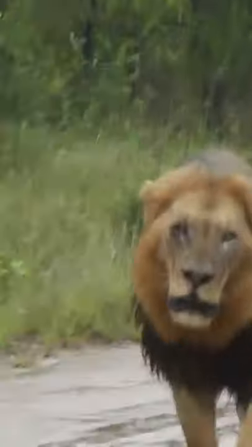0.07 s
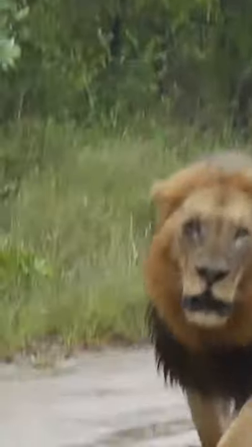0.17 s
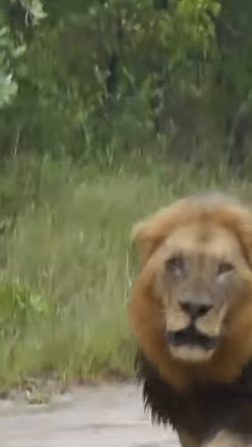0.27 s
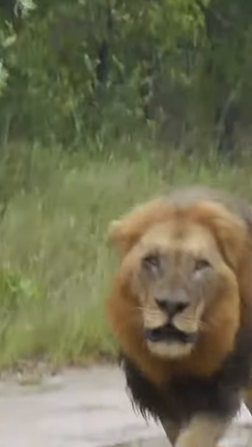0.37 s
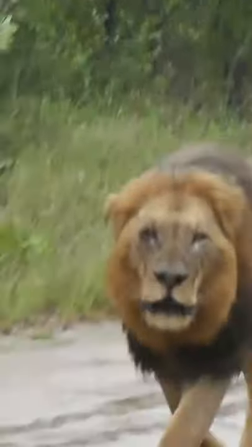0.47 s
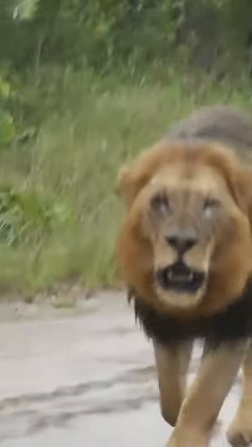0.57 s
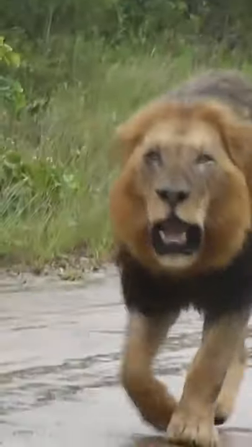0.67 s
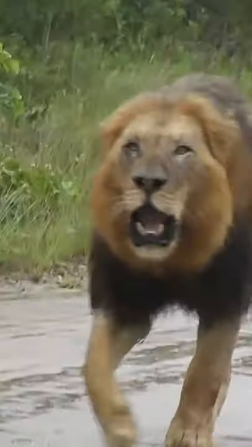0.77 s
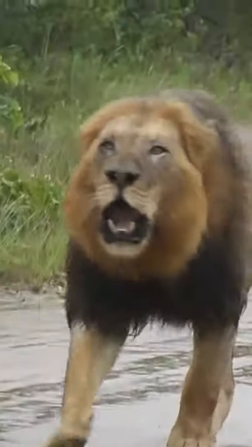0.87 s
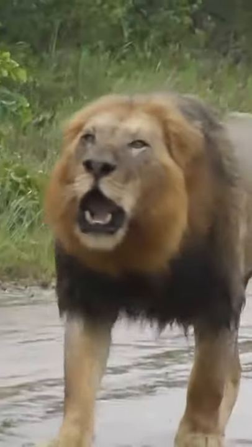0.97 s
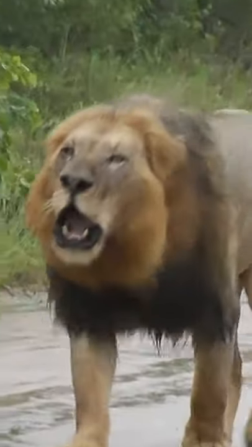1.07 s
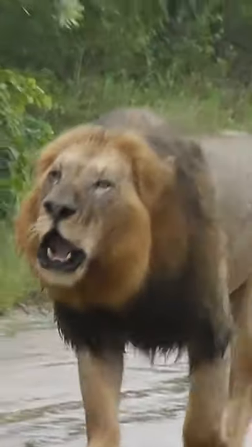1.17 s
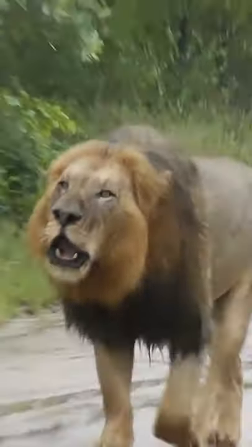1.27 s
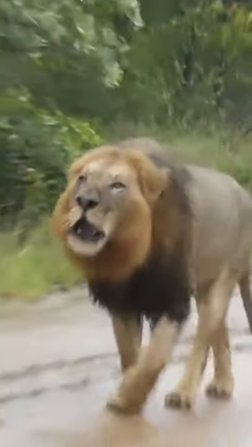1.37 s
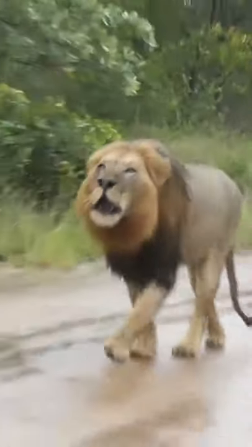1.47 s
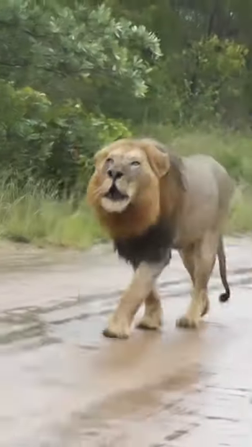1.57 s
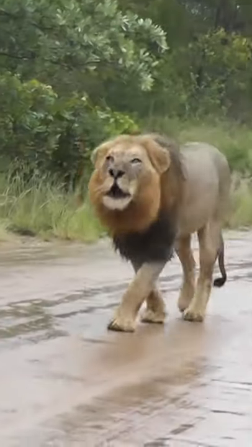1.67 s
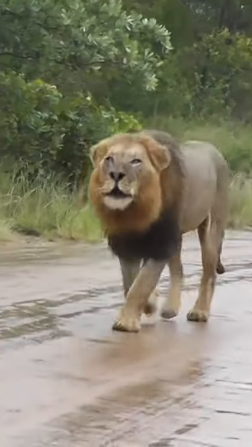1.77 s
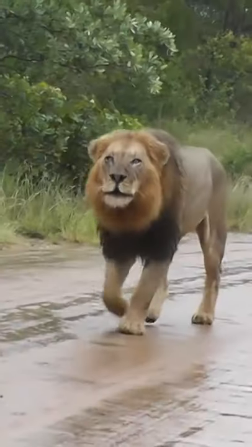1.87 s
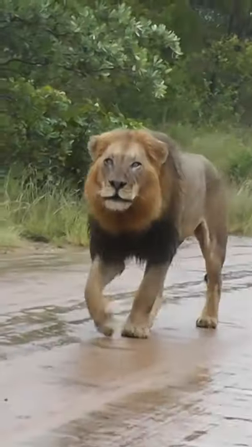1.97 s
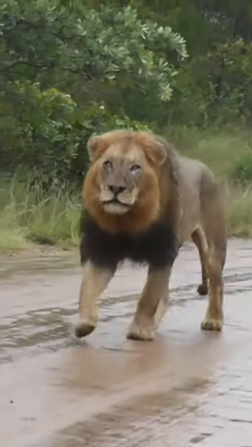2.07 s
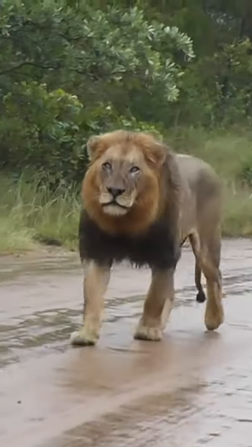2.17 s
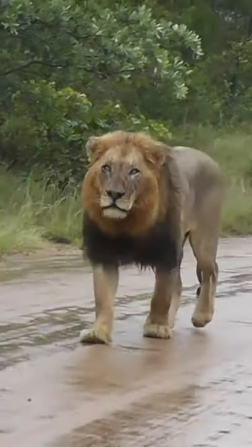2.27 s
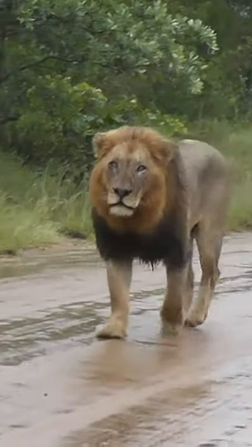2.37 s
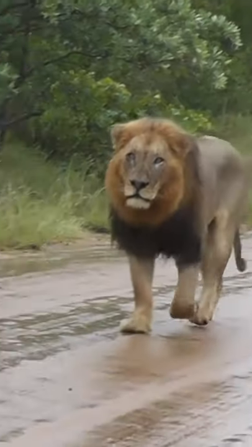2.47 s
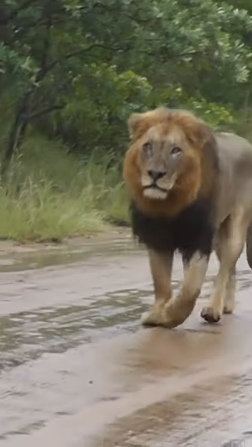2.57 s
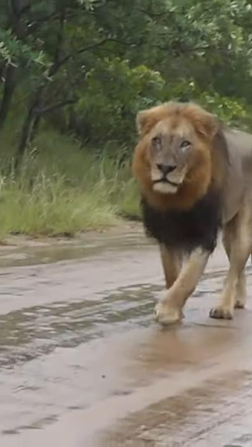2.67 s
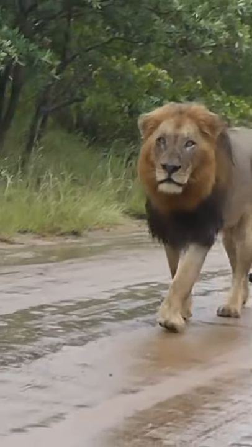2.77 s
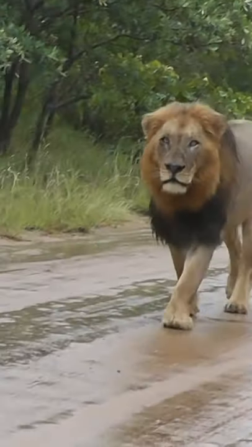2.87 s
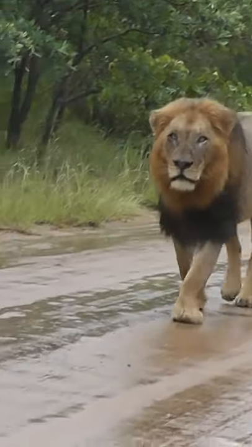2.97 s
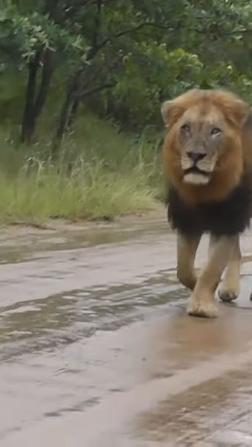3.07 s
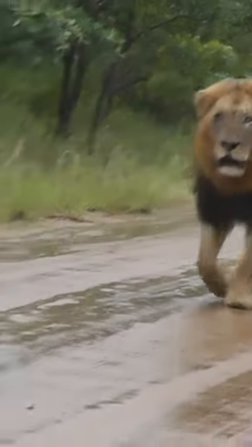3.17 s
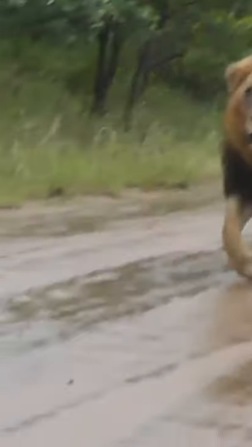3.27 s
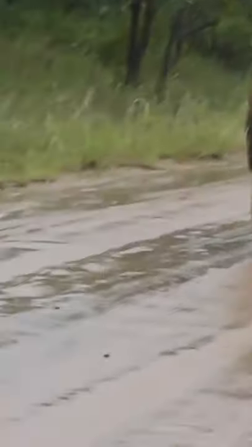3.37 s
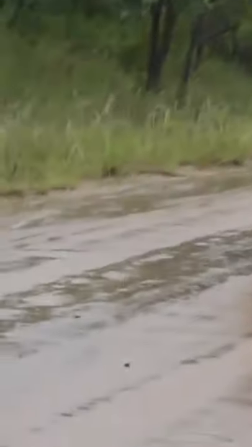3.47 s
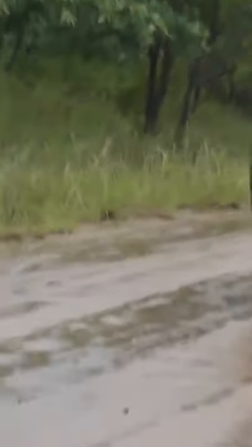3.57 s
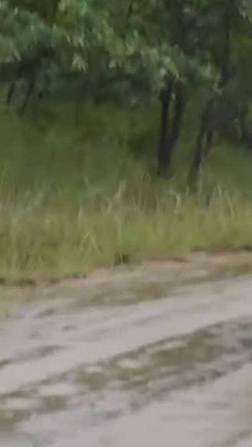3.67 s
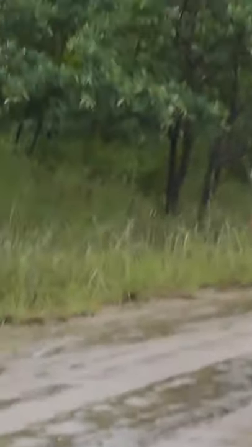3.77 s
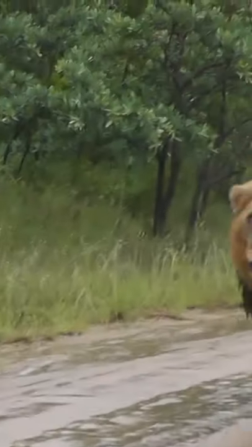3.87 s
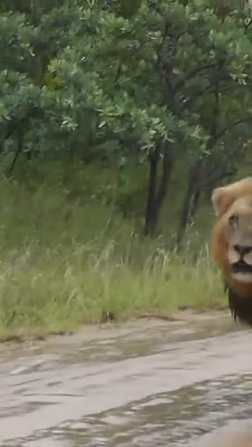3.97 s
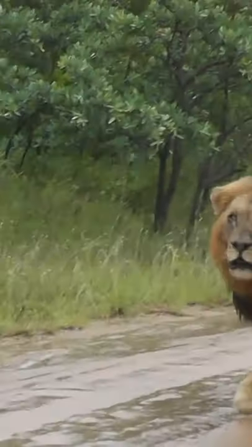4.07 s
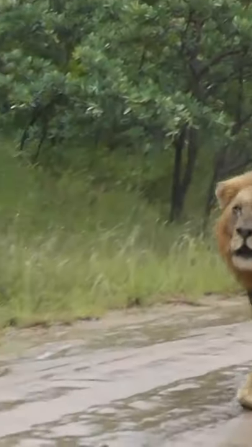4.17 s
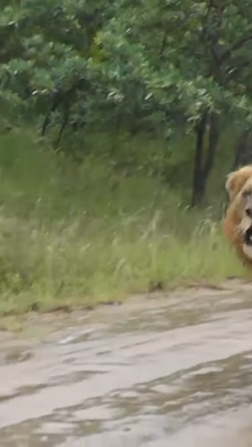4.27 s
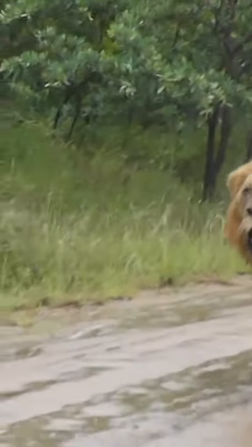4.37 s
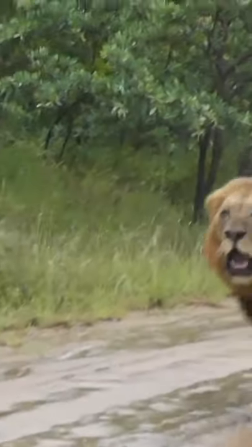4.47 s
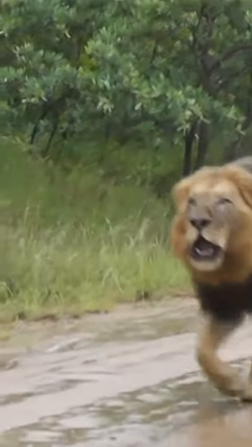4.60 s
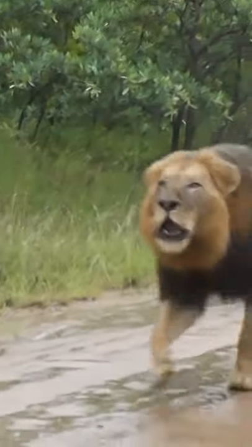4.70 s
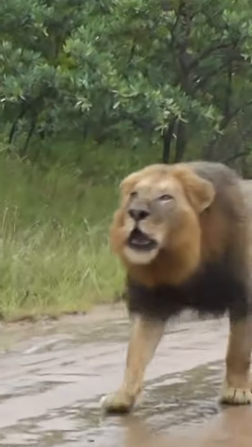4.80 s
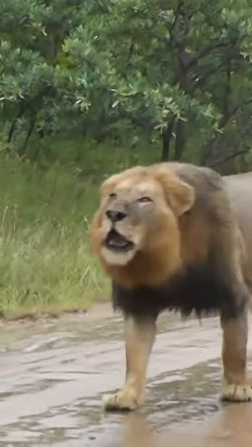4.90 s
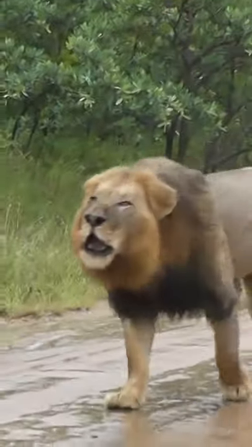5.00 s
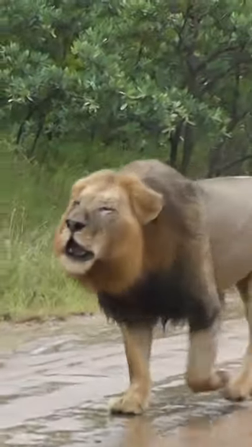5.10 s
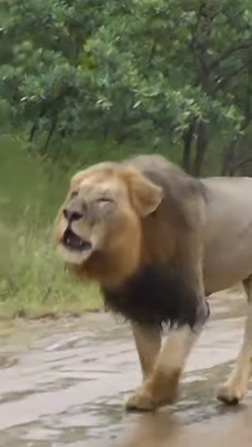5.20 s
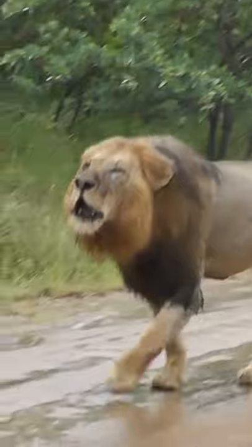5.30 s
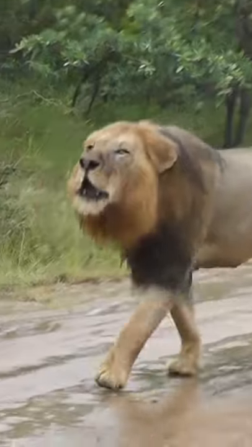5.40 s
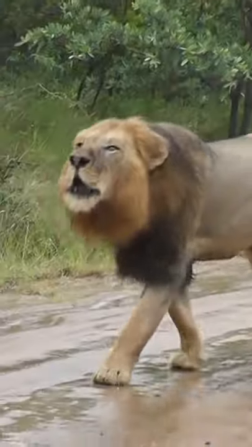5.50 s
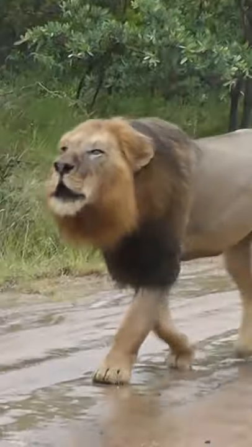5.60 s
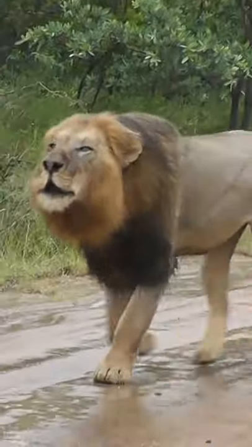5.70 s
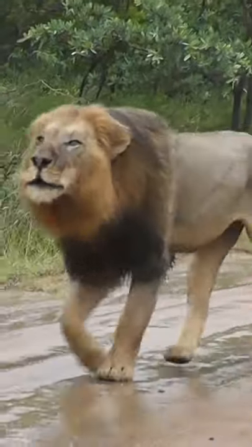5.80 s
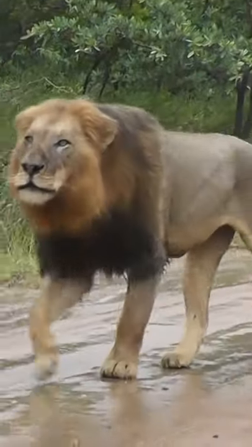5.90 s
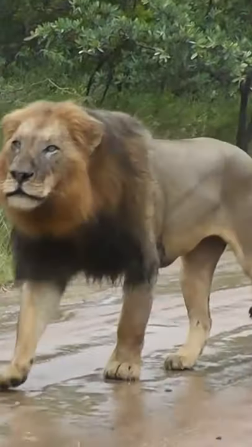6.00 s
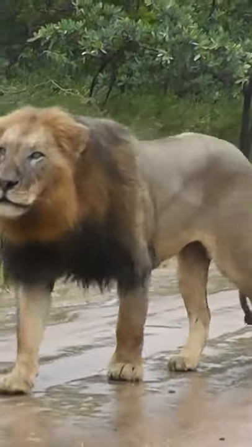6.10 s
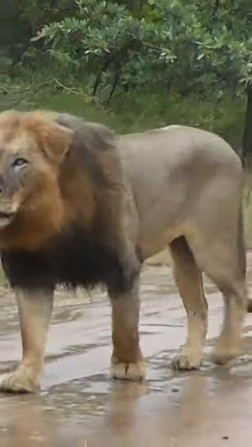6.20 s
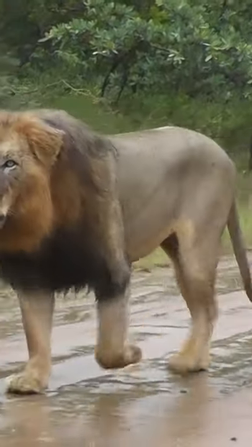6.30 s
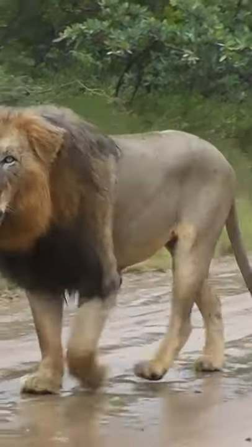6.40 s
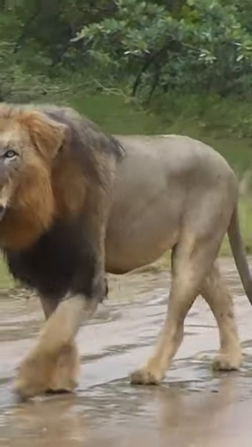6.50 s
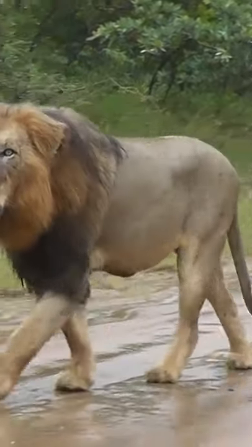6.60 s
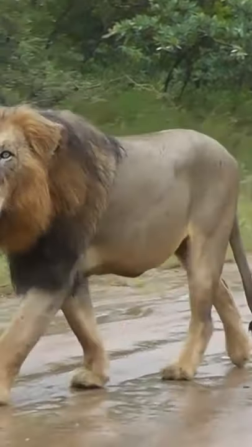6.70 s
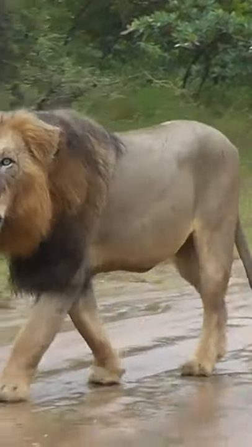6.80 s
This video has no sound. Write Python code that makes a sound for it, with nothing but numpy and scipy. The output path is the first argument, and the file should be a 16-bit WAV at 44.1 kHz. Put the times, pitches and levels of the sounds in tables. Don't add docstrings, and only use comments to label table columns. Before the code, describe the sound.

Two lions call in turn over a steady low engine hum. The near one is loud and throaty, its tonal moans breaking into rough, fluttering growls with breathy rasp; the other is softer and duller. Short scrub echoes follow. Light rain hisses and occasional drops click on the camera housing, with a faint high motor whine at the start. The camera microphone's automatic level dips the background under the roars.

```python
import sys
import numpy as np
from scipy import signal
from scipy.fft import rfft, irfft, next_fast_len
from scipy.io import wavfile
from scipy.ndimage import uniform_filter1d, map_coordinates

SR = 44100
rng = np.random.default_rng(int(sys.argv[2]) if len(sys.argv) > 2 else 0)


def undo_db(level):
    steps = np.asarray(level, float) / 20
    return 10 ** steps


def to_wav(s):
    ch = np.atleast_2d(s).T
    pcm = np.round(np.clip(ch, -1, 1) * 32767)
    wavfile.write(sys.argv[1], SR, pcm.astype(np.int16))


N = 302085
TIME = np.arange(N) / SR


def unit(x):
    return x / np.sqrt(np.mean(x ** 2) + 1e-20)


def along(points, hz):
    f, v = np.transpose(points)
    return np.interp(np.log(hz + 1), np.log(f + 1), v)


def curves(rows):
    s, *cols = np.transpose(rows)
    return [np.interp(TIME, s, c) for c in cols]


def sounding(rows, fade_s=0.017):
    return np.clip(np.minimum(TIME - rows[0][0], rows[-1][0] - TIME) / fade_s, 0, 1)


def wobble(rate):
    return map_coordinates(rng.standard_normal(int(N * rate / SR) + 4), [TIME * rate])


def filtered(x, response):
    m = next_fast_len(N + SR // 2)
    return irfft(rfft(x, m) * response(np.fft.rfftfreq(m, 1 / SR)), m)[..., :N]


def modes(table):
    return lambda f: sum((-1) ** k * undo_db(db) * 1j * f * w / (c * c - f * f + 1j * f * w)
                         for k, (c, w, db) in enumerate(table))


def sliding(x, response, factor, full_hz=1, patchy_db=0):
    hz, t, z = signal.stft(x, SR, nperseg=2048, noverlap=1792)
    shift = np.interp(t, TIME, factor) ** (np.minimum(hz / full_hz, 1) ** 2)[:, None]
    field = uniform_filter1d(rng.standard_normal(shift.shape), size=14, axis=0)
    field = uniform_filter1d(field, size=7, axis=1)
    z = z * response(hz[:, None] / shift) * undo_db(patchy_db * unit(field))
    return signal.istft(z, SR, nperseg=2048, noverlap=1792)[1][..., :N]


def placed(x):
    # (frequency [Hz], left minus right [dB])
    tilt = [(100, 3), (250, -2), (500, -3), (1200, -5), (2500, -3), (5000, -2.5), (10000, 2)]
    # (frequency [Hz], left port's lead [rad])
    lead = [(60, -0.1), (260, -0.45), (700, -0.016), (1400, 0.19)]
    half = np.array([[.5], [-.5]])
    return filtered(np.atleast_2d(x), lambda f: undo_db(half * along(tilt, f)) * np.exp(1j * half * along(lead, f)))


def moans():
    # (time [s], pitch [Hz], level [dB])
    near_moans = [
        [(0.62, 192.5, -28.5), (0.76, 294.5, -14.5), (0.9, 307.5, -37)],
        [(0.82, 338, -16), (0.866, 370.3, -38), (1.024, 319.6, -16), (1.156, 328, -22), (1.21, 322.4, -29),
         (1.42, 316, -23.5)],
        [(1.0, 238, -35), (1.13, 258.2, -20.5), (1.2, 266.2, -12), (1.33, 263.2, -18), (1.43, 241.5, -32),
         (1.48, 262, -36)],
        [(1.45, 198, -27.5), (1.6, 175.5, -32.5), (1.635, 157.8, -18), (1.792, 142.6, -27.5), (1.86, 163, -23)],
        [(4.425, 222, -30), (4.455, 242.5, -17.5), (4.52, 253.3, -18), (4.745, 253.2, -12.5)],
        [(4.735, 274.5, -20.5), (4.79, 264.5, -28), (4.85, 271, -25)],
        [(4.84, 279.8, -17), (4.88, 279.2, -36.5), (5.09, 256.5, -27.5)],
        [(5.06, 261.8, -32.5), (5.274, 269.9, -35.5), (5.444, 258.3, -34), (5.53, 258.8, -48)],
        [(5.47, 186, -25.5), (5.546, 162.6, -17.5), (5.74, 152.4, -22), (5.77, 155.6, -35), (5.86, 170, -40)],
        [(4.27, 127.1, -37.5), (4.31, 150.7, -19.5), (4.35, 168.8, -11.5), (4.39, 193, -11), (4.415, 202, -20),
         (4.445, 228, -27.5)],
        [(1.2, 564.3, -40), (1.33, 572, -21), (1.42, 586, -19.5), (1.485, 566, -30)],
        [(1.42, 215.9, -44), (1.5, 208.3, -33.5), (1.535, 209.4, -31.5), (1.56, 203.7, -52), (1.61, 207.2, -37),
         (1.645, 199, -34.5)],
    ]
    # (time [s], pitch [Hz], level [dB])
    far_moans = [
        [(0.08, 126.9, -33.5), (0.294, 213.6, -33), (0.376, 224, -33), (0.464, 175.5, -24), (0.62, 158, -22),
         (0.748, 152.2, -23), (0.97, 144, -30.5)],
        [(2.7, 149, -59), (2.764, 153.1, -33.5), (2.85, 207.6, -30), (2.875, 236.5, -33), (3.14, 251.4, -29),
         (3.36, 254.6, -43)],
        [(3.18, 171, -42.5), (3.398, 160, -23.5), (3.596, 157, -24.5), (3.64, 152.4, -40)],
        [(5.99, 190.4, -32.5), (6.06, 180.6, -26.5), (6.168, 168.5, -20), (6.354, 159.3, -21.5),
         (6.482, 159.6, -30), (6.53, 169.5, -44.5)],
    ]
    voicing = [(0.29, 0.04), (0.12, 0.03), (.08, 0.16), (.22, 0.34), (0.03, 0.53), (0.1, 0.64), (.13, 0.54),
               (0.2, 0.48), (0, 0.29), (0.05, 0.6), (0.22, 0), (0.24, 0.19), (0.14, 0.03), (0.18, 0.7),
               (0.32, 0.01), (0.26, 0)]
    partials = [(2, 4), (2,), (1.5, 2), (1.5, 2.5), (2, 3, 4), (2, 3), (1.5, 2, 3), (1.5, 2, .63), (2, 3),
                (2, 3, 5), (1.11,), (2, 3, 5), (2,), (2,), (2.5,), (1.5, 2, 2.5)]
    # (level at start [dB], level at end [dB])
    overtones = [
        [(-27, -36), (-55, -44)],
        [(-33.5, -36.5)],
        [(-41, -22.5), (-26.5, -30)],
        [(-25.5, -38), (-27.5, -26.5)],
        [(-22.5, -22.5), (-45, -43), (-38.5, -55.5)],
        [(-18.5, -16), (-50, -35.5)],
        [(-22, -31), (-15.5, -18), (-62, -59)],
        [(-46, -39.5), (-24.5, -26.5), (-33.5, -31.5)],
        [(-31, -23), (-30.5, -24.5)],
        [(-40, -7.5), (-43, -21.5), (-42, -49.5)],
        [(-35.5, -29)],
        [(-31.5, -20), (-23.5, -25), (-31, -46)],
        [(-44.5, -51)],
        [(-54, -48)],
        [(-40, -46)],
        [(-50, -29), (-34.5, -47), (-38.5, -50)],
    ]
    # (time [s], depth [dB])
    catches = [(.44, 12), (1.195, 10), (4.415, 4), (4.436, 6), (4.505, 12), (4.536, 12), (4.562, 12),
               (4.59, 12), (4.617, 14), (4.645, 12), (4.683, 16), (4.853, 8), (3.44, 10), (3.47, 8),
               (3.513, 20), (3.599, 20)]
    catch_s, slip_rad = .003, 2.6
    follows = 0.48
    halving = .7

    out, buzz, clarity = np.zeros((3, N))
    catch = undo_db(-sum(db * np.exp(-.5 * ((TIME - s) / catch_s) ** 2) for s, db in catches))
    slips = slip_rad * sum((1 - undo_db(-db)) / (1 + np.exp(np.clip((s - TIME) / 0.00083, -50, 50)))
                           for s, db in catches)
    for rows, (rough, clear), multiples, ends in zip(near_moans + far_moans, voicing, partials, overtones):
        span = slice(round(rows[0][0] * SR), round(rows[-1][0] * SR))
        hz, level_db = [c[span] for c in curves(rows)]
        swell_db = follows * (level_db - level_db.max())
        levels_db = [level_db] + [np.linspace(a, b, len(hz)) + swell_db for a, b in ends]
        phase = 2 * np.pi * np.cumsum(hz * (1 + 0.0892 * rough * wobble(60)[span])) / SR - slips[span]
        on = (sounding(rows) * catch)[span]
        for k, db in zip((1, *multiples), levels_db):
            out[span] += on * undo_db(db + 4.0 + 9.3 * rough * wobble(45)[span]) * np.sin(k * phase + k)
        cycles = 1 + halving * (1.5 in multiples) * np.cos(phase / 2)
        upper = sum(np.cos(k * phase + .3 * k * k) for k in range(4, 22))
        buzz[span] += clear * on * unit(cycles * upper)
        clarity[span] += clear * on
    return placed(out), buzz, np.clip(clarity, 0, 1)


def roars():
    # (time [s], effort level [dB], throat centre [Hz], mouth opening [dB])
    long_roars = [
        [(.63, -30, 442, -25.5), (.758, -31.5, 280, -24.5), (.95, -24.5, 340, -20), (1.146, -24.5, 325, -19),
         (1.21, -32.5, 334, -13), (1.45, -18, 470, -19), (1.7, -21.5, 350, -10.5), (1.86, -22.5, 360, -10.5),
         (2.03, -26.5, 347, -11), (2.09, -55, 405, 3)],
        [(3.12, -45, 315, -28), (3.18, -32, 400, -31), (3.63, -28, 288, -31), (3.7, -35, 307, -26)],
        [(4.28, -33, 372, -19), (4.346, -18, 392, -28.5), (4.44, -22.5, 390, -25.5), (4.708, -21.5, 362, -19.5),
         (4.76, -18.5, 490, -22), (4.87, -24.5, 514, -2.5), (5.2, -24.5, 464, -5.5), (5.5, -20, 406, -8),
         (5.892, -24.5, 356, -12), (5.99, -39.5, 340, -11)],
        [(6.12, -31, 399.9, -33), (6.492, -26.5, 310.4, -17.5), (6.56, -43.5, 337, -16)],
    ]
    # (time [s], effort level [dB], throat centre [Hz])
    short_grunts = [
        (3.835, -33.5, 605),
        (6.708, -35, 519),
    ]
    rise_s, hold_s, fall_s = 0.019, 0.032, .04
    swing_db, sags, mouth_db = 14, 0.8, -15
    # (time after onset [s], below peak [dB], throat factor)
    shape = [(-rise_s, swing_db, 1), (0, 0, 1), (hold_s, 0, sags), (hold_s + fall_s, swing_db, sags)]
    grunts = [[(s + after, db - under_db, hz * sag, mouth_db) for after, under_db, sag in shape]
              for s, db, hz in short_grunts]
    return sorted(long_roars + grunts)


def gaits():
    # (start [s], slaps [1/s], irregularity [0-1], slap strength [dB], air leak [dB])
    slap_gaits = [(.6, 120, 0.37, -0.2, -8), (1.21, 60, 0.01, -8.5, -26), (1.44, 89.4, 0.56, -3.5, -12),
                  (1.6, 80, 0.29, 3, -8.5), (1.82, 68.5, 0.49, -1.7, -9.5), (1.89, 63, 0.37, -0.7, -9.5),
                  (3.1, 118, 0.26, -1.5, -0.5), (3.749, 223, 0.78, 2.5, -17), (4.25, 82, 0.33, -1.5, -11),
                  (4.34, 66, 0.36, -17, -8), (4.429, 97, 0.4, -29.5, -36), (4.497, 77, 0.67, -2, -16.5),
                  (4.76, 129, 0.27, -35, -16), (4.851, 147, 0.18, 2, -20), (5.101, 124, 0.34, 3, -19.5),
                  (5.519, 79, 0.16, -6.5, -18.5), (5.7, 59.4, 0.3, -0.5, -12.5),
                  (6.051, 77, 0.55, -1.5, -9), (6.601, 280, 0.75, 7, -21)]
    tiring, shift_s = .2, .03
    table = np.array(slap_gaits)
    index = np.maximum(np.searchsorted(table[:, 0], TIME) - 1, 0)
    start, rate, ragged, share_db, leak_db = table[index].T
    rate = rate * np.clip(1 - tiring * ragged * (TIME - start), .5, 1)
    held = np.array([rate, np.clip(ragged, 0, 1), share_db, leak_db])
    return uniform_filter1d(held, round(shift_s * SR), axis=1)


def chest_ring(slaps, leak, centre_hz):
    # (centre [Hz], width [Hz], level [dB])
    chest_modes = [(171.3, 63, -2.5), (392, 142, -0.5), (563, 213, -1.5), (789, 394, -8.5)]
    # (start [s], end [s])
    far_spans = [
        (3.05, 3.75),
        (6.05, 6.6),
    ]
    far_top_hz = 600
    chest = sliding(slaps + leak, lambda f: modes(chest_modes)(f) ** 2, centre_hz / 400)
    chest /= np.sqrt(np.abs(uniform_filter1d(chest ** 2, SR // 6)) + 1e-12)
    far = sum(sounding([[a], [b]]) for a, b in far_spans)
    return chest + far * (filtered(chest, lambda f: 1 / (1 + (f / far_top_hz) ** 4)) - chest)


def mouth_rasp(breath, jaw, torn_db):
    # (centre [Hz], width [Hz], half level [dB])
    moan = [(850, 200, -1), (1147, 240, -0.5), (2270, 130, -2), (2760, 100, 2), (3200, 100, -1.5),
            (3600, 200, -4)]
    first_growl = [(760, 180, 4), (1046, 270, 4.5), (1400, 180, 1), (2050, 640, 1.5), (2700, 570, 3.5),
                   (3355, 710, 1)]
    rising = [(1009, 240, 1.5), (1590, 160, 5), (2020, 280, 1), (2453, 112, 6.5), (2850, 196, 4),
              (3280, 130, -6.5)]
    gaping = [(810, 100, -5.5), (1090, 100, -6.5), (1360, 110, 2.5), (1620, 100, -1), (1880, 120, -5),
              (2260, 190, -1.5), (2900, 260, -5.5)]
    second_growl = [(890, 110, -8), (1160, 160, 0), (1400, 100, 1.5), (1590, 80, -.5), (1810, 120, -5.5),
                    (2010, 80, -3), (2340, 120, -2), (2850, 200, -6), (3350, 500, -13)]
    tired = [(867, 130, -4.5), (1145, 150, 1), (1430, 143, 1), (1980, 200, -4), (2380, 310, -3.5),
             (2810, 770, -7), (3370, 470, -8)]
    changes_s = [
        1.44,
        4,
        4.838,
        5.065,
        5.62,
    ]
    # (time [s], factor on the gaping resonances)
    gape_moves = [
        (4.84, 1.045),
        (4.95, 1.0),
        (5.07, .94),
    ]
    reshape_s = .03
    slow = (jaw, 3200)
    shapes = [(moan, slow), (first_growl, slow), (rising, slow), (gaping, (curves(gape_moves)[0], 1)),
              (second_growl, slow), (tired, (np.ones(N), 1))]
    now = 1. * (np.searchsorted(changes_s, TIME) == np.arange(6)[:, None])
    shares = uniform_filter1d(now, round(reshape_s * SR), axis=1)
    rung = [unit(sliding(breath, lambda f: modes(m)(f) ** 2, *moves, torn_db)) for m, moves in shapes]
    return sum(np.sqrt(np.abs(shares)) * rung)


def teeth_hiss(air, jaw, torn_db):
    # (frequency [Hz], density [dB per Hz])
    teeth_first = [(2240, -34), (3800, -11), (5440, 9.5), (6720, -14), (7930, -4), (13900, -27.5),
                   (15500, -43.5)]
    # (frequency [Hz], density [dB per Hz])
    teeth_second = [(3900, -24), (4150, -1), (5050, 0), (5400, -13), (6500, -9), (7200, -22), (11000, -13),
                    (15500, -32)]

    def apart(f):
        return 1 / (1 + (7500 / (f + 1)) ** 8)

    hiss = filtered(air[0], lambda f: 1 - apart(f)) + filtered(air[1:] + 0.38 * air[0], apart)
    pair = [unit(sliding(hiss, lambda f: undo_db(along(s, f)) / (1 + (3700 / (f + 1)) ** 12), jaw, 1, torn_db))
            for s in (teeth_first, teeth_second)]
    return np.where(TIME < 4, *pair)


def growl(buzz, clarity):
    # (time [s], level over the growl [dB])
    heavy_slaps = [(0.681, 5), (1.492, 3), (1.52, 2), (1.608, 6), (1.803, 5), (1.87, 2), (1.908, 6),
                   (1.925, 2), (1.972, 5), (5.09, 4), (5.16, 4), (5.232, 5), (5.32, 4), (5.375, 5),
                   (5.44, 4), (5.685, 4), (5.735, 5), (5.762, 4), (5.806, 5), (5.826, 5), (5.848, 5),
                   (5.87, 2), (5.884, 5), (5.9, 4)]
    # (time [s], factor on the mouth resonances)
    jaw_moves = [
        [(.6, .98), (1.1, .98), (1.38, 1.02), (1.45, .93), (1.47, 1.0), (1.9, 1.0), (2.05, 0.95)],
        [(4.3, 0.97), (4.8, 1.03), (4.95, 1.0), (5.28, 0.97), (5.42, 0.88), (5.62, 0.84), (5.76, 0.82),
         (6.0, 0.82)],
    ]
    heave_rises_s, heave_fades_s = .003, .014
    bursts_db, bursts_per_s, torn_db = 3, 50, 2.6

    rate, ragged, share_db, leak_db = gaits()
    count = np.cumsum(rate * (1 + .5 * ragged * np.clip(wobble(70), -1.8, 1.8))) / SR
    at = np.flatnonzero(np.diff(np.floor(count)) > 0)
    slaps = np.zeros(N)
    uneven_db = 7 * ragged[at] * np.clip(rng.standard_normal(N)[at], -2.5, 1.3)
    slaps[at] = undo_db(uneven_db) / np.sqrt(rate[at] / 80)
    slaps[[round(s * SR) for s, db in heavy_slaps]] = 1
    heaves_db = sum(db * np.exp(-np.abs(TIME - s) / np.where(TIME < s, heave_rises_s, heave_fades_s))
                    for s, db in heavy_slaps)
    puffs = signal.fftconvolve(slaps, np.exp(-TIME[:SR // 20] / 0.0053))[:N]
    air = (puffs + 1.5) * undo_db(1.78 * wobble(17)) * rng.standard_normal((3, N))

    chest_db, centre_hz, open_db = curves(sum(roars(), []))
    mouth_db = chest_db + open_db
    teeth_db = mouth_db + leak_db
    jaw = curves(sum(jaw_moves, []))[0]
    breath = (1 - clarity) * unit(slaps + 0.28 * air[0]) + 0.58 * buzz
    out = undo_db(chest_db + share_db - 9.2 * clarity) * chest_ring(slaps, 0.083 * ragged * air[0], centre_hz)
    out = out + undo_db(mouth_db - 1.0) * mouth_rasp(breath, jaw, torn_db)
    out = out + undo_db(teeth_db + 3.5) * teeth_hiss(air, jaw, torn_db)
    on = sum(sounding(roar) for roar in roars())
    bursts = bursts_db * ragged * np.clip(wobble(bursts_per_s), -1.6, 1.1)
    return placed(on * undo_db(heaves_db + bursts) * out)


def rings():
    # (time [s], pitch [Hz], level [dB])
    ring_lines = [
        [(5.06, 422.2, -27), (5.102, 406.5, -22), (5.204, 405.7, -21), (5.264, 386.5, -27.5),
         (5.44, 395.1, -17), (5.448, 406, -36), (5.466, 385.1, -13.5), (5.488, 382, -11), (5.53, 392, -43)],
        [(1.66, 321, -27), (1.698, 321.4, -35), (1.722, 365.7, -22), (1.806, 350.3, -26), (1.828, 305, -31),
         (1.854, 302.4, -27), (1.944, 404.2, -31), (1.97, 336.5, -25), (2.05, 325, -43)],
        [(1.68, 493, -29), (1.768, 499, -30.5), (1.882, 497.2, -41), (1.902, 554, -23), (1.934, 489, -39),
         (1.974, 584.5, -24), (1.994, 538, -47), (2.012, 528, -32), (2.05, 596, -36)],
        [(3.15, 313, -40), (3.196, 430.6, -34.5), (3.31, 398, -36.5), (3.33, 443, -49), (3.342, 389.5, -38),
         (3.422, 371, -28), (3.484, 384, -37), (3.552, 325.6, -28), (3.67, 315, -43)],
        [(6.13, 371.2, -41), (6.136, 388.4, -31), (6.286, 326.5, -37.5), (6.33, 393.5, -40), (6.36, 384, -34),
         (6.396, 335.6, -27), (6.474, 326, -32), (6.496, 358, -27), (6.53, 338, -45)],
        [(5.76, 208, -24), (5.782, 205.5, -18), (5.804, 220, -15), (5.838, 318, -26), (5.89, 322.6, -26),
         (5.93, 354, -38)],
    ]
    wavers, shakes_db = .02, 3
    out = np.zeros(N)
    for rows in ring_lines:
        hz, level_db = curves(rows)
        phase = 2 * np.pi * np.cumsum(hz * (1 + wavers * wobble(50))) / SR
        out += sounding(rows) * undo_db(level_db + 2 + shakes_db * wobble(40)) * np.sin(phase)
    return placed(out)


def bush(x):
    # (frequency [Hz], t60 [s])
    decay = [(150, 0.26), (1000, 0.3), (8000, 0.037)]
    hz, t, z = signal.stft(rng.standard_normal((2, SR // 2)), SR, nperseg=256)
    tail = signal.istft(z * undo_db(-60 * t / along(decay, hz)[:, None]), SR, nperseg=256)[1]
    tail = tail[0] + 0.19 * tail[1] * np.array([[1], [-1]])
    return signal.fftconvolve(x, tail / np.linalg.norm(tail[0]), axes=1)[:, :N]


def ducking(lions):
    ears_hz, knee_db, squeeze, recover_s = 426, -34.5, 0.98, 0.19
    heard = filtered(lions.mean(axis=0), lambda f: 1 / (1 + (ears_hz / (f + 1)) ** 4))
    keep = np.exp(-1 / (recover_s * SR))
    level_db = 10 * np.log10(signal.lfilter([1 - keep], [1, -keep], heard ** 2) + 1e-12)
    return -squeeze * np.maximum(level_db - knee_db, 0)


def engine():
    # (order of the shaft, level [dB])
    orders = [(4, -21), (5, -10), (6, 0), (7, -22), (8, -18), (10.5, -20), (16.25, -20), (22.4, -24)]
    shaft_hz, idle_db = 14.85, -32
    shaft = 2 * np.pi * np.cumsum(shaft_hz * (1 + 0.0016 * wobble(2.6))) / SR
    hum = sum(undo_db(db + 1.05 + min(abs(k - 6), 3) * 0.29 * wobble(7.2)) * np.sin(k * shaft + 1.24 * k)
              for k, db in orders)
    noise = rng.standard_normal(N) + 4.9 * rng.standard_normal((2, N))
    rumble = unit(filtered(noise, lambda f: modes([(70, 60, 0)])(f) ** 2))
    return undo_db(idle_db) * (hum * undo_db([[.3], [-.3]]) + undo_db(-14.5) * rumble)


def drizzle():
    # (frequency [Hz], density [dB per Hz])
    spectrum = [(90, -32), (160, -0.5), (250, -4), (420, -10.5), (800, -16), (1450, -21), (2300, -28.5),
                (6800, -25.5)]
    # (frequency [Hz], left-right likeness [0-1])
    likeness = [(30, .5), (80, 1), (1000, 0.6), (5500, 0.99), (7500, 0.08), (12000, 1)]
    level_db, top_hz = -39.5, 7800
    z = signal.stft(rng.standard_normal((2, N)), nperseg=512)[2]
    field = uniform_filter1d(uniform_filter1d(rng.standard_normal(z.shape[1:]), 8, 0), 10, 1)
    patches_db = np.linspace(1.2, 5, len(field))[:, None] * unit(field)
    pair = signal.istft(z * undo_db(patches_db), nperseg=512)[1][:, :N]

    def response(hz):
        turn = np.arccos(np.clip(along(likeness, hz), -1, 1)) / 2
        return undo_db(along(spectrum, hz)) / (1 + (hz / top_hz) ** 7) * [np.cos(turn), np.sin(turn)]

    mid, side = filtered(pair, response)
    return undo_db(level_db) * unit(np.array([mid + side, mid - side]))


def drops():
    # (time [s], peak level [dB])
    ticks = [(0.467, -35), (0.919, -31), (2.2598, -33), (2.576, -40), (3.0998, -33), (3.2236, -30),
             (3.3568, -34.5), (3.687, -22), (4.1764, -37.5), (4.682, -37.5), (6.512, -51), (6.556, -21.5),
             (6.6326, -22.5)]
    out, t = np.zeros((2, N + SR)), TIME[:200]
    for s, db in ticks:
        tick = rng.standard_normal(200) + 2.5 * rng.standard_normal((2, 200))
        out[:, round(s * SR):][:, :200] += undo_db(db - 13.5 - 60 * t / 0.017) * tick
    return filtered(out[:, :N], lambda f: modes([(7500, 7000, 0)])(f) ** 2)


def lens():
    whines_hz = [7167, 5740, 12387]
    # (time [s], level [dB])
    surges = [(0.02, -36.5), (0.17, -27.5), (0.25, -32), (.33, -34.5), (.41, -43.5), (.475, -43),
              (0.63, -36), (.72, -45.5), (.8, -51)]
    # (time [s], level [dB])
    high_surges = [
        (0.906, -58),
        (1.178, -59.5),
    ]
    rise, fall = 200, 140

    def surge(rows):
        return np.max([db - np.where(TIME < s, rise * (s - TIME), fall * (TIME - s)) for s, db in rows], axis=0)

    on = sounding([[-1], [0.87]])
    levels = [undo_db(surge(surges)) * on,
              undo_db(-46.5 - 16.4 * TIME) * on,
              undo_db(np.maximum(surge(high_surges), -76.5)) * sounding([[.35], [2.2]])]
    out = np.zeros(N)
    for level, hz in zip(levels, whines_hz):
        flutter = undo_db(5.5 + 2.9 * wobble(59.6) + 1.2 * wobble(16.17))
        out += level * flutter * np.sin(2 * np.pi * hz * TIME + 0.43 * wobble(43))
    return out


def scene():
    low, buzz, clarity = moans()
    lions = low + growl(buzz, clarity) + rings()
    echoes = undo_db(-17) * bush(lions)
    duck_db = ducking(lions)
    background = undo_db(duck_db) * engine() + undo_db(0.33 * duck_db) * drizzle()
    return lions + echoes + background + drops() + lens()


def top_cut(x):
    return signal.sosfilt(signal.butter(12, 15750, fs=SR, output="sos"), x)


def record(dry):
    top_hz = 15700
    mix = filtered(dry, lambda f: 1 / (1 + (f / top_hz) ** 40))
    return top_cut(mix)


dry = scene()
out = record(dry)
to_wav(out)
```